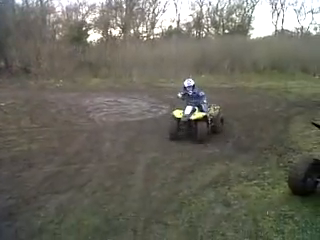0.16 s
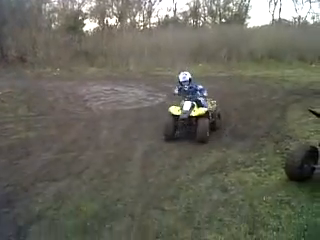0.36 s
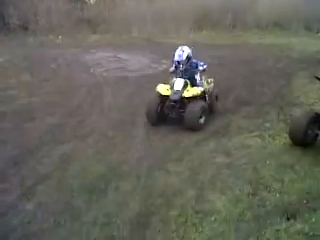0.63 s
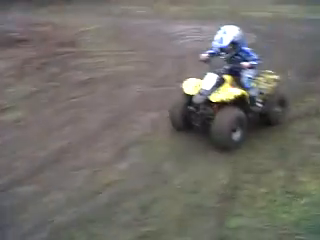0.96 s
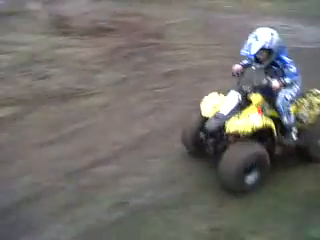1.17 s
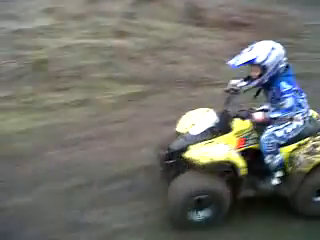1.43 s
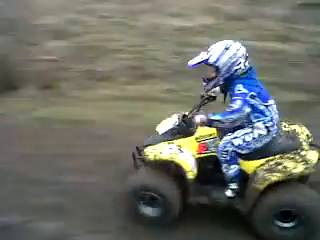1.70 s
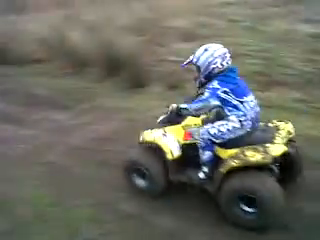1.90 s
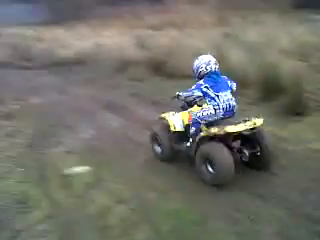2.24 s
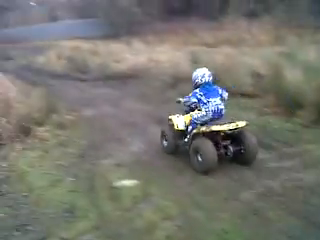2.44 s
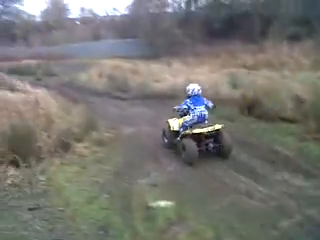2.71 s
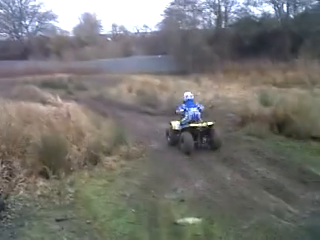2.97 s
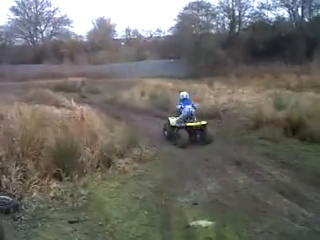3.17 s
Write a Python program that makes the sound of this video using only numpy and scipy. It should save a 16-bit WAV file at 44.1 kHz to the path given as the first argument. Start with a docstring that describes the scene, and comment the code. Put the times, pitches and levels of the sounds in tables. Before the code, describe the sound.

A small two-stroke quad bike approaches at a nearly steady pitch across a muddy field. It passes close to the microphone with a raspy buzz, engine clatter and a few light knocks, then fades as it rides away.

```python
"""On a muddy field, a small two-stroke quad bike rides past two metres away at a nearly even speed.
Its engine fires once a turn: the air intake booms as it comes, and the exhaust pipe buzzes as it leaves.
The piston and cooling fins clatter, the tyres churn wet ground, loose panels ring, the chain whines
and the frame knocks over bumps. Behind it are a parked quad thumping softly and a faint outdoor wash."""
import sys
import numpy as np
from scipy import signal
from scipy.fft import rfft, irfft
from scipy.io import wavfile
from scipy.ndimage import map_coordinates

SR = 44100
rng = np.random.default_rng(int(sys.argv[2]) if len(sys.argv) > 2 else 0)


def digitize_waveform(pressure):
    """Quantize a signal to 16-bit integers and store it at the path in sys.argv[1].

    Rows of a 2-D input are taken as channels; values are limited to [-1, 1].
    """
    field = np.atleast_2d(pressure).T
    bounded = np.clip(field, -1, 1)
    quanta = np.round(bounded * 32767).astype(np.int16)
    wavfile.write(sys.argv[1], SR, quanta)


N = 147735
T = np.arange(N) / SR
FREQS = np.maximum(np.fft.rfftfreq(N, 1 / SR), 1)

# How often the engine fires (t/s, rate/Hz)
ENGINE_SPEED = [(0.0, 114.3), (0.23, 108.0), (0.73, 99.6), (0.95, 100.5), (1.01, 103.2), (1.07, 101.0),
                (1.12, 103.2), (1.19, 101.1), (1.28, 102.3), (1.36, 98.7), (1.5, 102.6), (1.73, 99.9),
                (1.86, 103.1), (2.03, 102.2), (2.2, 104.7), (2.28, 103.0), (2.52, 104.8), (2.58, 107.2),
                (2.77, 104.2), (2.93, 108.4), (3.03, 105.2), (3.15, 110.2), (3.23, 107.9), (3.35, 113.7)]
# Strength of the tones at 1, 2 and 3 times the engine speed (t/s, first/dB, second/dB, third/dB)
BOOM_LEVELS = [(0.0, -38, -31, -52), (0.03, -40.5, -28.5, -43), (0.61, -42, -27.5, -39.5),
               (1.38, -36.5, -20, -35.5), (1.41, -36, -22, -40), (1.44, -32, -20, -36.5),
               (1.78, -36, -22.5, -39.5), (1.95, -33.5, -25, -31), (2.77, -37, -39.5, -36),
               (2.85, -39, -34, -36.5), (2.92, -35, -40.5, -42.5), (3.03, -38, -37, -36.5),
               (3.33, -39.5, -33.5, -42), (3.35, -45, -36, -41)]
# Strength of the higher sounds (t/s, buzz/dB, rasp/dB, clatter/dB, hiss/dB)
UPPER_LEVELS = [(0.0, -38.5, -44.5, -36, -49), (0.19, -38.5, -50.5, -37, -48.5),
                (0.54, -37.5, -46.5, -36.5, -49), (0.92, -36.5, -42.5, -34, -45.5),
                (1.04, -33.5, -41.5, -31.5, -47), (1.55, -32.5, -33.5, -28, -40),
                (1.65, -33, -39, -28, -40), (1.85, -32.5, -30, -27.5, -39.5),
                (2.05, -28, -32.5, -27.5, -42), (2.18, -31.5, -33, -25, -41),
                (2.32, -35, -35.5, -29.5, -43), (2.6, -42, -43, -32.5, -46.5), (3.25, -45, -47, -36, -50.5),
                (3.35, -44, -51, -40, -51)]
# Strength of the snarl, two tones near the pitch at which the silencer rings (t/s, level/dB)
SNARL_LEVELS = [(0.0, -48), (0.66, -44), (0.7, -40.5), (0.97, -48.5), (1.32, -37), (1.35, -44), (1.44, -32),
                (1.93, -24.5), (2.1, -31.5), (2.25, -27), (2.52, -33), (2.63, -45), (3.05, -35),
                (3.35, -53)]

# When we face the bike's front, front corner, side and rear (t/s)
VIEW_TIMES = [0.5, 1.3, 1.872, 2.6]
# Strength of the rattle and of the sizzle above it (front/dB, corner/dB, side/dB, rear/dB)
RATTLE_BY_VIEW = [0, -2, -3, 0]
SIZZLE_BY_VIEW = [-13, -18.5, -20.5, -11.5]
# Mix of exhaust and engine case tones (multiple of engine speed, front/dB, corner/dB, side/dB, rear/dB)
BUZZ_TONES = [(4, -23.5, -19.5, -16, -10.5), (5, -2.5, -6.5, -3, -4), (6, -4.5, -1, -3.5, -1),
              (7, -5.5, -4, -3.5, -6.5), (8, -14.5, -12, -7.5, -12)]
SNARL_TONES = [(10, 1, -2, -5.5, 2), (11, -1.5, 5, -1.5, -10.5)]
RASP_TONES = [(9, -7, -4.5, -11, -4.5), (12, -7, -11, -9, -15.5), (13, -5, -4.5, -15.5, -5.5),
              (14, -10.5, -6.5, -5.5, -9), (15, -3, -14, -13.5, -3), (16, -13, -12.5, -17.5, -11),
              (17, -24.5, -14.5, -7, -16.5)]
CASE_TONES = [(19, -11, -26, -15.5, -32), (20, -26, -9.5, -20.5, -21), (21, -22.5, -23.5, -21.5, -21.5),
              (22, -19.5, -15.5, -17, -16.5), (23, -14.5, -13, -16, -17), (24, -16.5, -11.5, -21.5, -20.5),
              (26, -17, -15.5, -12, -18.5), (27, -17.5, -14, -13.5, -27), (28, -26.5, -29.5, -18, -31),
              (30, -26.5, -25.5, -17.5, -21), (40, -26, -26, -31.5, -34.5),
              (41, -22.5, -25.5, -37.5, -29.5)]
# Mix of chain tones (multiple of the tooth rate, front/dB, corner/dB, side/dB, rear/dB)
CHAIN_TONES = [(4, -17, -30, -7, -27), (5, -15.5, -16, -11, -8.5), (6, -16, -14.5, -11, -11),
               (7, -28.5, -34, -20.5, -22.5), (8, -32, -23.5, -28.5, -34), (10, -42, -29, -36, -43)]

# Pitches at which the bike rings easily, lifting any tone nearby (f/Hz, width/Hz, extra gain)
RESONANCES = [(1120, 360, 0.41), (2777, 200, 0.57)]
# Pitches at which the cooling fins and covers ring (f/Hz, width/Hz, level/dB)
FIN_RINGS = [(1920, 240, -7), (2339, 170, 2.5), (2560, 200, -3.5), (2740, 140, 1), (2850, 120, -19.5)]
# Balance of low and high in the pipe's gas, the hiss, the tyres and the field (f/Hz, level/dB)
PIPE_COLOUR = [(300, -5), (410, 2.5), (600, 11), (800, -1.5), (1080, 4.5), (1300, -3), (1550, -4.5),
               (1800, -0.5)]
HISS_COLOUR = [(1760, -39), (3000, 7.5), (3610, -12.5), (4200, -8), (4880, -16), (5300, -15), (5710, -19),
               (7050, -45), (9160, -79), (15500, -120)]
TYRE_COLOUR = [(20, -5), (40, -26), (70, -0.5), (110, -10.5), (160, -3.5), (250, 4), (400, -11.5),
               (900, -2), (3000, -41)]
FIELD_COLOUR = [(20, -5.5), (60, -1), (250, -6), (420, -0.5), (700, 1), (1100, -12), (1500, 9), (1900, -11),
                (3300, -2.5), (4500, -20), (7000, -55.5)]

# Moments when a loose panel rings (t/s, length/s, f/Hz, width/Hz, level/dB)
PANEL_RINGS = [(0.207, 0.55, 4500, 200, -55.5), (0.597, 0.077, 1445, 40, -41),
               (1.046, 0.35, 4580, 220, -52.5), (1.061, 0.015, 2530, 119, -31),
               (1.365, 0.054, 1990, 59.6, -38)]
# Moments when the chain sings out (t/s, length/s, multiple of the tooth rate, level/dB)
CHAIN_CHIRPS = [(0.31, 0.1, 6, -49), (0.72, 0.2, 6, -46), (1.13, 0.11, 5, -38), (1.31, 0.07, 5, -36),
                (2.185, 0.14, 4, -32.5), (2.43, 0.15, 6, -40)]
# Knocks of the frame (t/s, level/dB)
BUMPS = [(1.055, -30), (1.544, -24), (2.034, -26)]

TEETH_PER_TURN = 4.53  # teeth that meet the chain in one engine turn


def undb(db):
    """Turn decibels into a number to multiply by."""
    return 10 ** (np.asarray(db) / 20)


def unit(x):
    """Scale a sound to a standard strength of 1."""
    return x / np.std(x)


def curve(table, column):
    """One column of a table, joined by straight lines in time."""
    rows = np.array(table)
    return np.interp(T, rows[:, 0], rows[:, column])


def noise():
    """An even rush of all pitches: white noise."""
    return rng.standard_normal(N)


def wander(rate_hz):
    """A smooth random drift, usually between about -1 and 1."""
    points = rng.standard_normal(1024)
    smooth = map_coordinates(points, [2 * rate_hz * T[::64]], order=2, mode="mirror")
    return unit(np.interp(T, T[::64], smooth))


def shape(x, gain):
    """Filter a sound: turn each frequency up or down by its gain."""
    return irfft(rfft(x) * gain, N)


def colour(points):
    """Filter gains along a line through (f/Hz, level/dB) points."""
    hz, db = np.array(points).T
    return undb(np.interp(np.log(FREQS), np.log(hz), db))


def band(lo_hz, hi_hz):
    """Filter gains that keep only what lies between two frequencies."""
    return 1 / np.sqrt((1 + (lo_hz / FREQS) ** 20) * (1 + (FREQS / hi_hz) ** 20))


def peak(hz, centre_hz, width_hz):
    """How strongly a ringing part answers: 1 at its own pitch, less to either side."""
    return 1 / (1 + (2 * (hz - centre_hz) / width_hz) ** 2)


def fin_colour():
    """Filter gains of the ringing metal fins and covers."""
    return np.sqrt(sum(undb(db) ** 2 * peak(FREQS, hz, width) for hz, width, db in FIN_RINGS))


def swell(at, length):
    """A smooth rise and fall, highest at the given time."""
    return np.exp(-(2 * (T - at) / length) ** 2)


def nearness(closest_s=2.04, width_s=0.45):
    """1 when the bike is closest, less when it is farther away."""
    return 1 / np.hypot(1, (T - closest_s) / width_s)


def facing(values):
    """Blend front, corner, side and rear values as the bike rides past."""
    return np.interp(T, VIEW_TIMES, values)


def shaft_tones(turns, table, smear=1):
    """Tones that follow a turning shaft; smear (0-1) puts them out of step to soften each pulse."""
    out, speed_hz = 0, np.gradient(turns) * SR
    for multiple, *views_db in table:
        lift = 1 + sum(gain * peak(multiple * speed_hz, hz, width) for hz, width, gain in RESONANCES)
        phase = 2 * np.pi * (multiple * turns + smear * rng.random()) + .17 * wander(25)
        db = facing(views_db) + 1.2 * wander(2.194) + 1.3 * wander(30)  # slow fade, quick flutter
        out = out + lift * np.sin(phase) * undb(db)
    return unit(out)


def puffs(turns, gain, decay_turns=2):
    """Swirling gas: filtered noise that jumps at each firing and eases off until the next."""
    return unit(shape(noise() * np.exp(-(turns % 1) / decay_turns), gain))


def intake_boom(turns):
    """Air pulsing through the intake and silencer makes the engine's three lowest tones."""
    out = 0
    for multiple, flutter_db, trim_db in [(1, 2.0, 1.8), (2, 0.5, 1.37), (3, 2.0, -2.3)]:
        tone = np.sin(2 * np.pi * (multiple * turns + rng.random()))
        fluttering = unit(tone * undb(flutter_db * wander(40)))
        out = out + fluttering * undb(curve(BOOM_LEVELS, multiple) + trim_db)
    return out


def exhaust(turns, smear=.75):
    """Firings ring the pipe: a clear buzz, a rougher rasp and a nasal snarl, with gas surging each turn."""
    surge = (1 + .6 * np.cos(2 * np.pi * turns)) * undb(-1.8 * nearness())  # less gas noise close by
    buzz = undb(1) * shaft_tones(turns, BUZZ_TONES, smear)
    buzz += undb(-14) * surge * puffs(turns, colour(PIPE_COLOUR) * band(210, 680))
    rasp = undb(1.1) * shaft_tones(turns, RASP_TONES)
    rasp += undb(-4.3) * surge * puffs(turns, colour(PIPE_COLOUR) * band(990, 1750))
    snarl = shaft_tones(turns, SNARL_TONES, smear) * undb(curve(SNARL_LEVELS, 1) - 1)
    return buzz * undb(curve(UPPER_LEVELS, 1)) + rasp * undb(curve(UPPER_LEVELS, 2)) + snarl


def chain_whine(turns):
    """The chain whines over the teeth, louder and softer as its slack changes."""
    slack_db = 2.5 * wander(4)
    teeth = TEETH_PER_TURN * turns + .035 * wander(22)
    return unit(shaft_tones(teeth, CHAIN_TONES) * undb(slack_db))


def clatter(turns):
    """The chain whines, the engine case rings and the fins rattle; gas hisses above them."""
    chain = undb(-6.5) * chain_whine(turns)
    case = undb(-5.8) * shaft_tones(turns, CASE_TONES)
    shake_db = 1.2 * wander(45)
    rattle = undb(facing(RATTLE_BY_VIEW) + shake_db - 3.3) * puffs(turns, fin_colour() * band(930, 3800))
    sizzle = undb(facing(SIZZLE_BY_VIEW) + shake_db) * puffs(turns, band(2980, 3400))
    hiss_db = curve(UPPER_LEVELS, 4) - 2.5 + shake_db + 1.5 * nearness() + 0.72 * wander(8)
    hiss = undb(hiss_db) * puffs(turns, colour(HISS_COLOUR) * band(3580, 8100))
    return (chain + case + rattle + sizzle) * undb(curve(UPPER_LEVELS, 3)) + hiss


def tyres(level_db=-36.5):
    """Knobbly tyres rumble on mud, loudest when nearest."""
    churn_db = 1.5 * wander(10)
    rumble = unit(shape(noise(), colour(TYRE_COLOUR)))
    return rumble * nearness() * undb(level_db + churn_db)


def parked_quad(firing_hz=15.5, ring_hz=143.5, decay_s=0.019, level_db=-43):
    """Each slow firing of the parked quad rings its silencer with a soft thump."""
    firings = np.cumsum(firing_hz * (1 + .02 * wander(2.7))) / SR
    since_firing_s = (firings % 1) / firing_hz
    thumps = np.sin(2 * np.pi * ring_hz * since_firing_s) * np.exp(-since_firing_s / decay_s)
    return unit(shape(thumps, band(47, 300))) * undb(level_db + 0.99 * wander(6.5))


def open_field(level_db=-42.5):
    """A faint, steady outdoor wash behind everything."""
    return unit(shape(noise(), colour(FIELD_COLOUR))) * undb(level_db)


def loose_panels():
    """Loose body parts are shaken into ringing, each at its own pitch."""
    out = 0
    for at, length, hz, width, db in PANEL_RINGS:
        ring = unit(shape(noise(), peak(FREQS, hz, width)))
        out = out + ring * undb(db) * swell(at, length)
    return out


def chain_chirps(turns):
    """The chain gives short, rough, high chirps as it tightens."""
    out = 0
    for at, length, multiple, db in CHAIN_CHIRPS:
        phase = 2 * np.pi * multiple * TEETH_PER_TURN * turns + .3 * wander(45)
        rough_tone = unit(np.sin(phase) * undb(2.5 * wander(45)))
        out = out + rough_tone * undb(db) * swell(at, length)
    return out


def frame_knocks(decay_s=0.011):
    """Bumps jolt the frame: each gives a short crack with a ring of metal."""
    jolts = sum(undb(db) * (T >= at) * np.exp(-np.abs(T - at) / decay_s) for at, db in BUMPS)
    crack = unit(shape(noise(), band(700, 4100)))
    metal = unit(shape(noise(), fin_colour()))
    return shape(jolts * unit(crack + metal), band(250, 5000))


def scene():
    """Add all the sounds into one channel; engine and chain follow the same count of turns."""
    speed_hz = curve(ENGINE_SPEED, 1) * (1 + .002 * wander(14))
    turns = np.cumsum(speed_hz) / SR
    engine = intake_boom(turns) + exhaust(turns) + clatter(turns)
    ongoing = engine + tyres() + parked_quad() + open_field()
    return (ongoing + loose_panels() + chain_chirps(turns) + frame_knocks())[None]


def record(dry, top_hz=7200):
    """Cut away the highest treble."""
    return signal.sosfilt(signal.ellip(10, .2, 80, top_hz, fs=SR, output="sos"), dry)


dry = scene()
out = record(dry)
digitize_waveform(out)
```